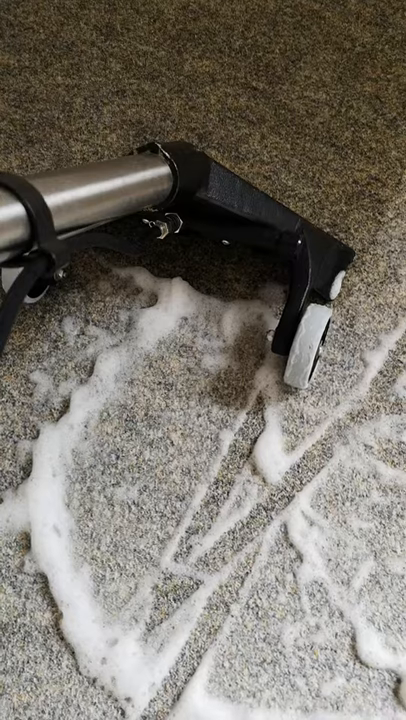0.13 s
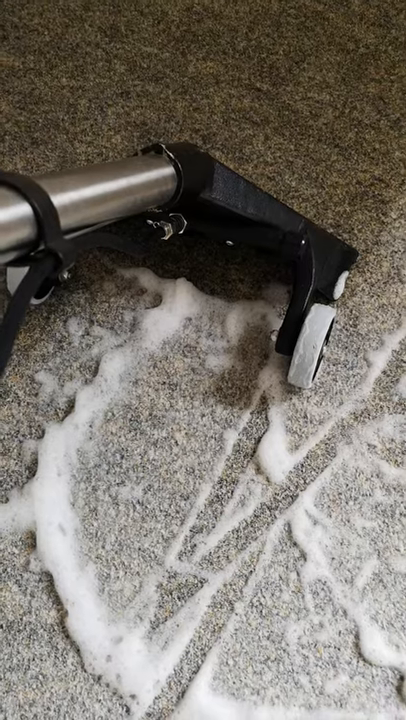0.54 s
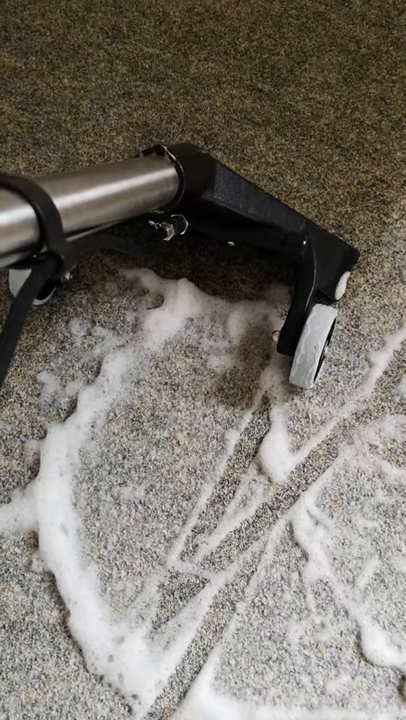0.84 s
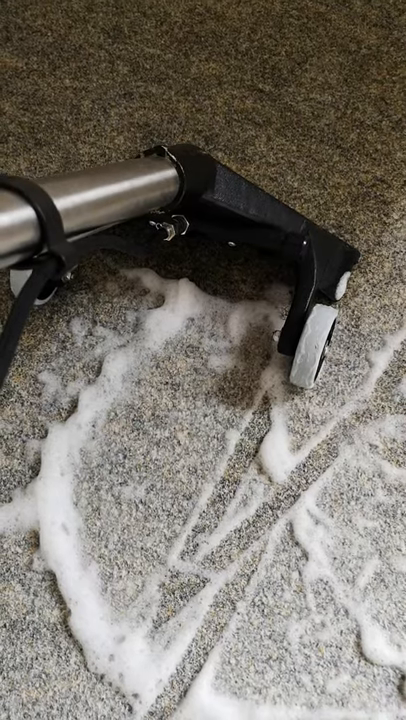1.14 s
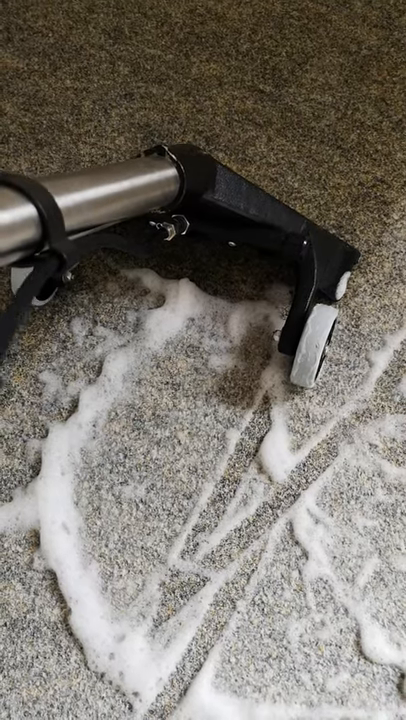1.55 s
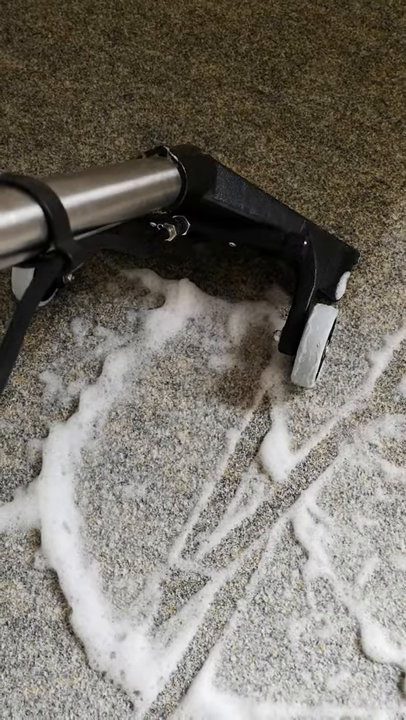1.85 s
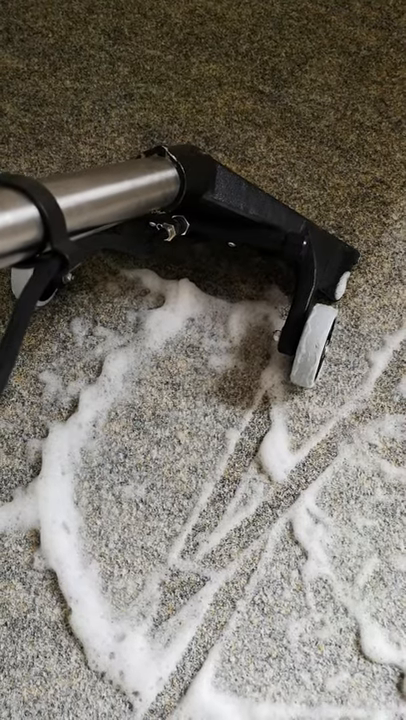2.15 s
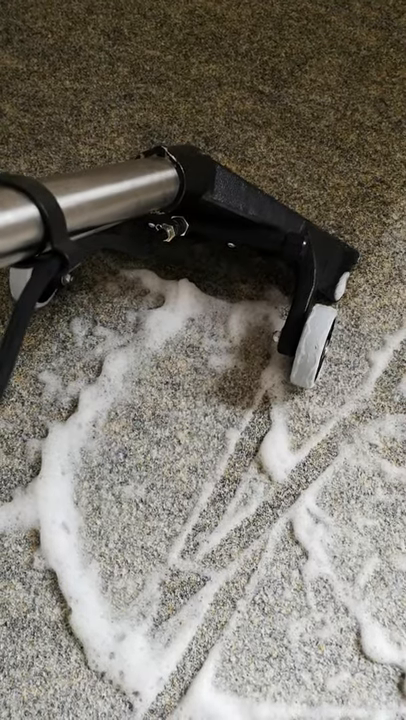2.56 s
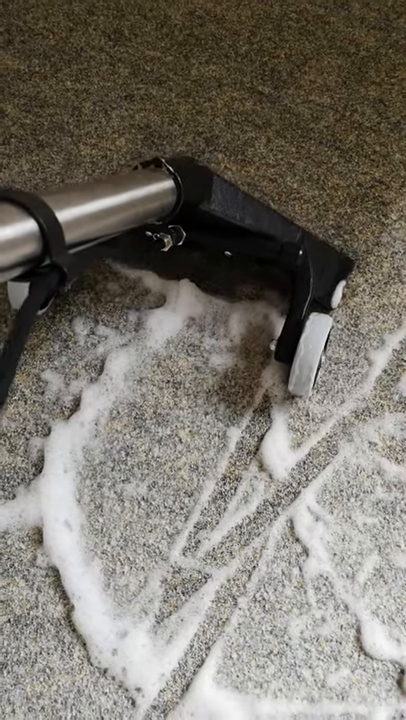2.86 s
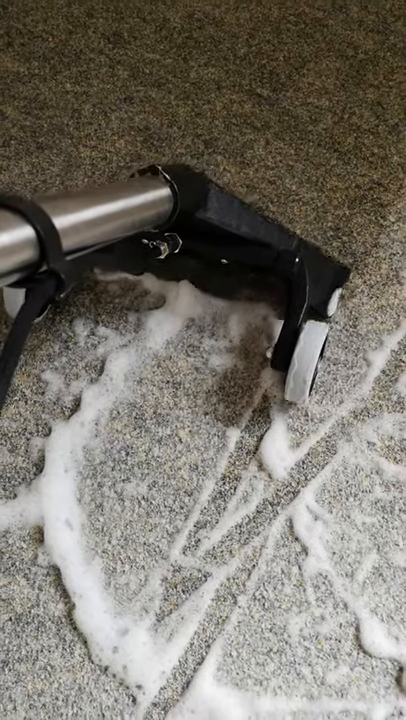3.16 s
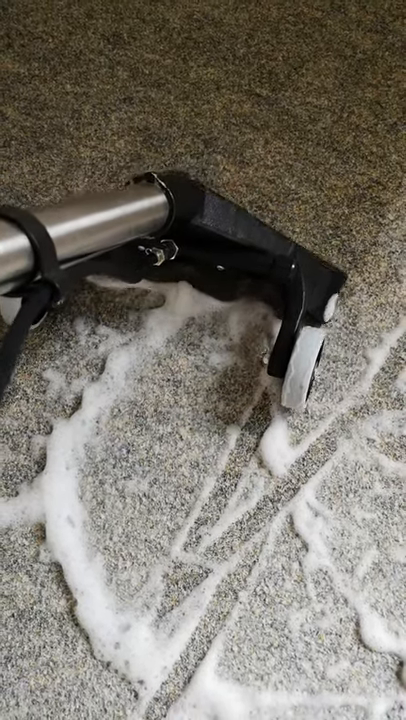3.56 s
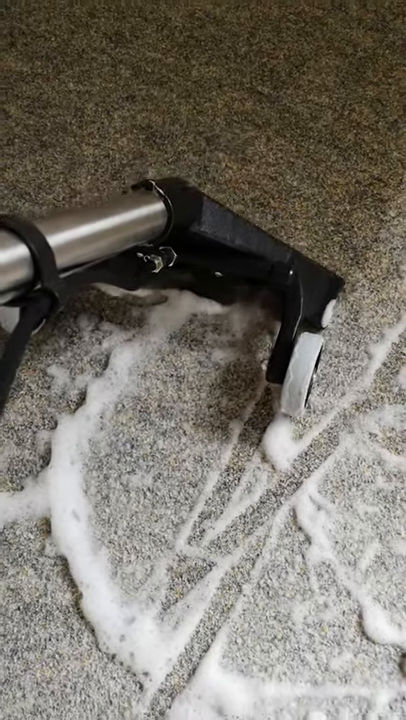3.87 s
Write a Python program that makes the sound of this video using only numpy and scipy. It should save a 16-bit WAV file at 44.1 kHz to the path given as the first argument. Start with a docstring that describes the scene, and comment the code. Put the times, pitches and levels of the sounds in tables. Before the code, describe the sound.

Indoors, a nearby carpet cleaner roars steadily over a whine and a low hum. Fuller at first, the rush of air turns wetter and hissier as the nozzle creeps over foam, slurping softly now and then.

```python
"""Carpet cleaner over foam

A carpet cleaning machine cuts in abruptly, already running in a carpeted room. Air roars through the
nozzle and rings in hose and housing, the suction turbine whines, a hollow drone wanders over mains hum.
At first the rush leans right and the rumble is fuller; then, as the head creeps over foam, a wet hiss
grows at the nozzle, which slurps and pops a bubble now and then."""
import sys
import numpy as np
from scipy import signal
from scipy.fft import rfft, irfft
from scipy.io import wavfile

SR = 44100
rng = np.random.default_rng(int(sys.argv[2]) if len(sys.argv) > 2 else 0)


def unload_wav(signal):
    """Save mono or channel-first audio to the path in sys.argv[1] as 16-bit WAV at rate SR, clipped to [-1, 1]."""
    wavfile.write(
        sys.argv[1],
        SR,
        np.round(np.clip(np.atleast_2d(signal).T, -1, 1) * 32767).astype(np.int16),
    )


N = 176400
T = np.arange(N) / SR
HZ = np.maximum(np.arange(N // 2 + 1) * SR / N, 1)

# Suction strength, riding the whole machine: time_s, gain_db
SUCTION = [(.45, -.6), (1.1, -1.2), (2.3, -.6), (3.1, 0), (3.5, -.5)]
# Air roar on the nearer, right side: freq_hz, level_db_per_hz
AIR_SPECTRUM = [(20, -69.5), (35, -101), (80, -76.5), (125, -64.5), (160, -68.5), (210, -58), (350, -58),
                (450, -60), (600, -61.5), (1100, -63), (1500, -61.5), (2050, -60.5), (2700, -61.5),
                (3050, -65), (3650, -63.5), (4250, -62), (4800, -60.5), (5850, -60), (6900, -64.5),
                (7750, -65), (8400, -74), (9000, -76.5), (10600, -75.5), (13000, -81), (15500, -84)]
# Hose and housing resonances: pitch_hz, early_level_db, late_level_db
HOSE_RESONANCES = [(48, -50, -53), (59, -51.5, -55), (140, -50, -49), (172, -50, -55), (226, -48, -51),
                   (284, -46, -49.5), (349, -45, -49.5), (678, -52, -50.5), (898, -42.5, -45),
                   (975, -43.5, -45), (1252, -47, -45), (1645, -53, -47), (1930, -47, -45.5),
                   (2090, -45, -46), (2290, -46, -45.5), (2540, -45.5, -47), (2650, -45.5, -46.5),
                   (3900, -48, -49), (4640, -42, -44), (5130, -47, -45.5), (5440, -43.5, -43),
                   (5705, -43, -42.5)]
# Crossfade between them as the head creeps on: time_s, late_share
HOSE_CROSSFADE = [(1.5, 0), (2.4, 1)]

# Turbine shaft speed: time_s, turns_per_s
SHAFT_SPEED = [(2.8, 382.6), (3.6, 385), (4, 385.6)]
# Partials of the whine: shaft_multiple, right_db, left_db, fade_db_per_s
WHINE_PARTIALS = [(5, -45, -46, -.5), (6, -37, -51, -1.7), (12, -35, -42.5, 0)]
# Swell and pan of the whine: time_s, left_gain_db, right_gain_db
WHINE_RIDE = [(.95, -2, 1), (1.1, 1.5, -1.5), (1.8, 1.5, -1.5), (2.15, -2, -8), (3.1, -4, -8),
              (3.5, -7, -4.5)]
# Wandering hollow drone: time_s, pitch_hz, level_db
DRONE_PATH = [(.45, 262, -38), (.85, 258, -35), (1.05, 258, -43.5), (1.9, 250, -48), (2.15, 252, -38),
              (2.4, 264, -33), (2.7, 265, -40.5), (2.95, 260, -42.5), (3.22, 248, -38.5), (3.5, 246, -55),
              (4, 250, -47)]
# Lower tone that beats with it late on: time_s, level_db
LOW_TONE_RIDE = [(3.1, -67), (3.32, -32), (3.52, -48.5), (4, -46)]
# Mains hum of the motor: time_s, level_db
HUM_RIDE = [(.45, -55), (3, -56), (3.8, -45.5)]

# Wet hiss at the nozzle: freq_hz, level_db_per_hz
HISS_SPECTRUM = [(600, -69.5), (1200, -68), (1600, -62.5), (2100, -61.5), (3200, -80), (7000, -95),
                 (9500, -71.5), (11500, -74.5), (13100, -75), (15200, -90)]
# Its build: time_s, gain_db
HISS_RIDE = [(.45, -28), (1.55, -14), (1.9, -3.5), (2.65, -5), (2.85, -3.5), (3.3, -5.5), (3.65, -2),
             (4, -3)]
# Thin sizzle on top: freq_hz, level_db_per_hz
SIZZLE_SPECTRUM = [(12500, -105), (14200, -69)]
# Its build: time_s, gain_db
SIZZLE_RIDE = [(1.4, -20), (1.9, -8), (2.95, -.5), (3.7, -3.5)]
# Gulps of foam: peak_s, width_s, body_gain_db, spray_gain_db
SLURP_CUES = [(1.62, 0.02, 3.5, .5), (2.86, .06, -8, -7.5), (3.2, 0.061, -7, -10), (3.71, 0.062, -4, -10)]
# Midrange body of a slurp: freq_hz, level_db_per_hz
BODY_SPECTRUM = [(700, -84), (1600, -64.5), (2500, -60.5), (3500, -75), (6000, -66), (10000, -95)]
# Bright spray of a slurp: freq_hz, level_db_per_hz
SPRAY_SPECTRUM = [(2500, -79), (5800, -63.5), (8500, -79), (10500, -72), (13200, -79), (15000, -88)]
# Bubbles popping in the nozzle: peak_s, pitch_hz, level_db
BUBBLE_CUES = [(1.618, 2050, -32), (2.375, 1270, -33), (2.908, 1620, -34), (3.725, 1770, -29)]

# Opening rush on the right: freq_hz, level_db_per_hz
RUSH_SPECTRUM = [(300, -89), (520, -57), (700, -62.5), (940, -60), (1400, -63), (2300, -60.5),
                 (3200, -65.5), (4550, -62), (5700, -60.5), (7500, -62.5), (9000, -77.5), (12000, -77.5),
                 (15000, -99)]
# Opening rumble: freq_hz, level_db_per_hz
RUMBLE_SPECTRUM = [(30, -89), (58, -54), (85, -77), (150, -64.5), (270, -55), (380, -57), (550, -72),
                   (900, -92)]

# Tone of the left side against the right: freq_hz, gain_db
LEFT_SHADE = [(270, 0.5), (520, -2.7), (950, 0.3), (1450, -5), (2200, -2), (3200, -2), (4000, -7),
              (5700, -7), (6700, -5), (7400, 0.5), (8800, 1), (10000, -10), (13000, -11), (15000, -15)]
# How far the left side trails: freq_hz, lag_rad
LEFT_LAG = [(90, 0), (250, 0.5), (350, 0.81), (690, 3), (1300, 6.5), (2380, 9.5)]
# Likeness of left and right: freq_hz, correlation
STEREO_LIKENESS = [(50, .995), (120, 0.93), (300, 0.77), (450, 0.56), (700, 0.33), (1300, 0.39),
                   (2400, 0.14), (4400, 0)]


def air_roar(bands=16, turbulence_db=.97, turbulence_hz=9.2):
    """Turbulent air in the nozzle: overlapping noise bands swell and sink on their own."""
    spectrum = stereo_noise() * from_db(over_hz(AIR_SPECTRUM))
    band_position = np.interp(np.log(HZ), np.log([150, 15000]), [0, bands - 1])
    out = 0
    for k in range(bands):
        band = irfft(spectrum * np.maximum(1 - abs(band_position - k), 0), N)
        out = out + band * from_db(turbulence_db * drift(turbulence_hz))
    return out


def hose_ring():
    """Air noise rings in hose and housing; the balance shifts as the head creeps on."""
    noise = stereo_noise()
    late_share, = over_time(HOSE_CROSSFADE)
    early = irfft(noise * np.sqrt(resonance_power(late=False)), N)
    late = irfft(noise * np.sqrt(resonance_power(late=True)), N)
    return early * (1 - late_share) + late * late_share


def resonance_power(late, base_width_hz=7, width_share=.011):
    """Power per Hz in the hose and housing resonances; higher ones are wider."""
    power = 0
    for hz, early_db, late_db in HOSE_RESONANCES:
        peak = 1 / (1 + ((HZ - hz) / (base_width_hz + width_share * hz)) ** 2) ** 2
        area = peak.sum() * SR / N
        power = power + from_db(late_db if late else early_db) ** 2 * peak / area
    return power


def turbine_whine(jitter=.0004, flutter_db=1.2, smear_depth=.35, smear_hz=22, left_lag_s=.0006):
    """The turbine sings at multiples of its shaft speed; moving air flutters and smears each partial."""
    speed, = over_time(SHAFT_SPEED)
    turns = np.cumsum(speed * (1 + jitter * drift(8.2))) / SR
    out = np.zeros((2, N))
    for multiple, right_db, left_db, fade_db_per_s in WHINE_PARTIALS:
        for ear, (db, lag_s) in enumerate([(left_db, left_lag_s), (right_db, 0)]):
            smear = 1 + smear_depth * (drift(smear_hz) + 1j * drift(smear_hz))
            tone = np.real(smear * np.exp(2j * np.pi * multiple * (turns - speed * lag_s)))
            flutter = from_db(flutter_db * drift(4))
            out[ear] += from_db(db + fade_db_per_s * T) * rms_one(tone * flutter)
    return out * from_db(over_time(WHINE_RIDE))


def drone_and_hum(waver_hz=1.5, rough_db=1.5, low_hz=228.2, mains_hz=100):
    """A hollow, wavering tone and a lower one beat over the motor's mains hum."""
    hz, db = over_time(DRONE_PATH)
    cycles = np.cumsum(hz + waver_hz * drift(12)) / SR
    hollow = np.sin(2 * np.pi * cycles) * from_db(db + rough_db * drift(38))
    low = np.sin(2 * np.pi * low_hz * T) * ride(LOW_TONE_RIDE) * from_db(rough_db * drift(7.5))
    hum = np.sin(2 * np.pi * mains_hz * T) * ride(HUM_RIDE)
    lean_left = from_db([[0], [-1]])
    return np.sqrt(2) * (hollow * lean_left + low + hum)


def wet_hiss():
    """Foam at the nozzle: a growing hiss with a thin sizzle on top."""
    hiss = coloured_noise(HISS_SPECTRUM) * ride(HISS_RIDE)
    sizzle = coloured_noise(SIZZLE_SPECTRUM) * ride(SIZZLE_RIDE)
    return hiss + sizzle


def slurps(gurgle_db=3.5, gurgle_hz=40):
    """Foam is sucked in with short, gurgling swells of wet noise."""
    body, spray = coloured_noise(BODY_SPECTRUM), coloured_noise(SPRAY_SPECTRUM)
    out = 0
    for peak_s, width_s, body_db, spray_db in SLURP_CUES:
        swell = np.exp(-.5 * ((T - peak_s) / width_s) ** 2)
        out = out + (body * from_db(body_db) + spray * from_db(spray_db)) * swell
    return out * from_db(gurgle_db * drift(gurgle_hz))


def bubble_pops(width_s=.006, chirp_hz_per_s=4000):
    """Each popping bubble rings as a tiny blip that rises in pitch."""
    out = 0
    for peak_s, hz, db in BUBBLE_CUES:
        t = T - peak_s
        envelope = from_db(db) * np.exp(-.5 * (t / width_s) ** 2)
        out = out + envelope * np.sin(2 * np.pi * t * (hz + .5 * chirp_hz_per_s * t))
    return np.sqrt(2) * out


def opening_rush(end_s=1.075, fade_s=.09, rings_above_hz=550):
    """Extra air, hard right, rings in the hose, holds and falls away."""
    air_power = from_db(over_hz(AIR_SPECTRUM)) ** 2
    ringing = np.sqrt(1 + resonance_power(late=False) * (HZ > rings_above_hz) / air_power)
    rush = irfft(rfft(coloured_noise(RUSH_SPECTRUM)) * ringing, N)
    return rush * np.clip((end_s - T) / fade_s, 0, 1) * [[0], [1]]


def opening_rumble(end_s=1, fade_s=.16):
    """Low noise adds weight at first, then falls away."""
    return coloured_noise(RUMBLE_SPECTRUM) * np.clip((end_s - T) / fade_s, 0, 1)


def room(x, t60_s=.2, wet_db=-13, low_cut_hz=400):
    """Short reflections, different at each ear, comb the sound above the bass."""
    tail = rng.standard_normal((2, N)) * from_db(-60 * T / t60_s)
    wet = from_db(wet_db) * HZ / np.hypot(HZ, low_cut_hz)
    reflections = rfft(tail / np.sqrt(np.sum(tail[0] ** 2)))
    return irfft(rfft(x) * (1 + wet * reflections) / np.sqrt(1 + wet ** 2), N)


def stereo_noise():
    """Noise spectrum, narrow in the bass and wide on top: flat on the right, late and shaded left."""
    mid, side = rfft(rng.standard_normal((2, N))) * np.sqrt(SR / 2)
    likeness = over_hz(STEREO_LIKENESS)
    mid, side = mid * np.sqrt((1 + likeness) / 2), side * np.sqrt((1 - likeness) / 2)
    left = (mid + side) * from_db(over_hz(LEFT_SHADE)) * np.exp(-1j * over_hz(LEFT_LAG))
    return np.array([left, mid - side])


def coloured_noise(spectrum):
    """Stereo noise shaped by a spectrum table."""
    return irfft(stereo_noise() * from_db(over_hz(spectrum)), N)


def drift(rate_hz):
    """Random wobble of rms 1, mostly slower than rate_hz."""
    return rms_one(irfft(rfft(rng.standard_normal(N)) / (1 + (HZ / rate_hz) ** 2), N))


def over_hz(table):
    """A frequency table's value at every bin."""
    hz, values = np.transpose(table)
    return np.interp(np.log(HZ), np.log(hz), values)


def over_time(table):
    """Each value column of a time table at every sample."""
    times, *columns = np.transpose(table)
    return [np.interp(T, times, column) for column in columns]


def ride(table):
    """A fader move in dB, as gain at every sample."""
    return from_db(over_time(table)[0])


def from_db(db):
    """Decibels to gain."""
    return 10 ** (np.asarray(db) / 20)


def rms_one(x):
    """Scale to rms 1."""
    return x / np.sqrt(np.mean(x ** 2) + 1e-20)


def scene():
    """Machine and foam follow the suction; the opening rush and rumble sit on top."""
    machine = room(air_roar()) + hose_ring() + turbine_whine() + drone_and_hum()
    foam = wet_hiss() + slurps() + bubble_pops()
    return (machine + foam) * ride(SUCTION) + opening_rush() + opening_rumble()


def record(dry):
    """A hard cut in from silence, with a steep high cut."""
    start_s, fade_s, cutoff_hz = .447, .002, 15300
    gate = np.clip((T - start_s) / fade_s, 0, 1)
    high_cut = signal.ellip(12, .1, 80, cutoff_hz, fs=SR, output="sos")
    return signal.sosfilt(high_cut, dry * gate + 1e-18)


dry = scene()
out = record(dry)
unload_wav(out)
```